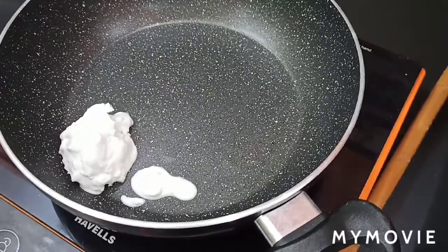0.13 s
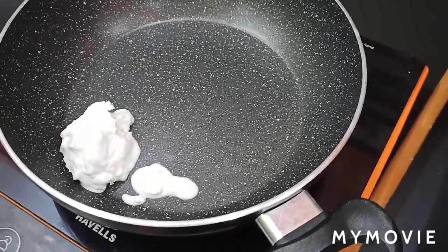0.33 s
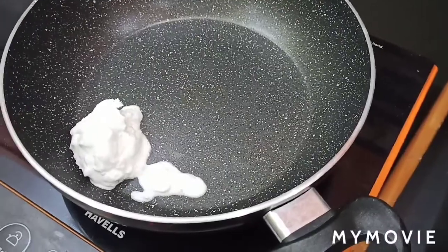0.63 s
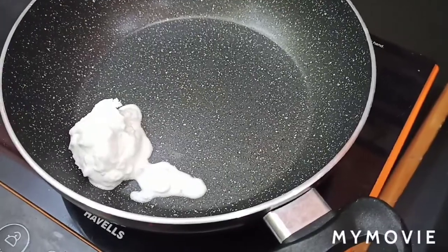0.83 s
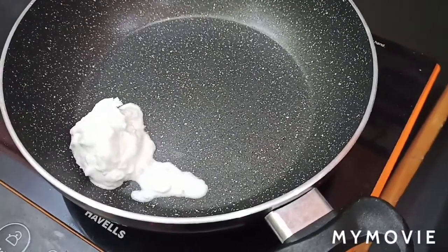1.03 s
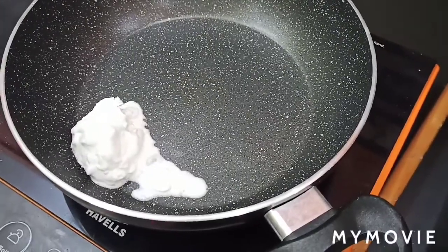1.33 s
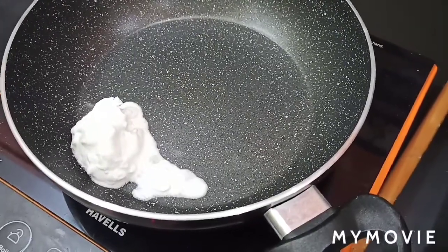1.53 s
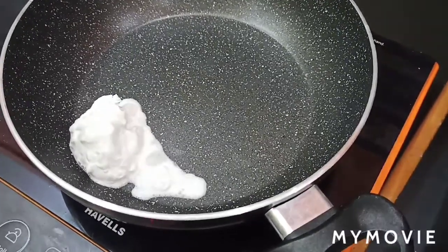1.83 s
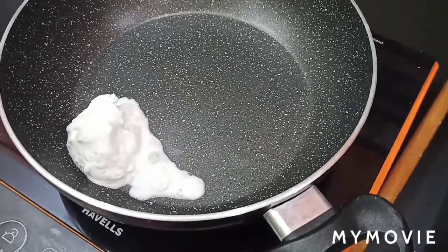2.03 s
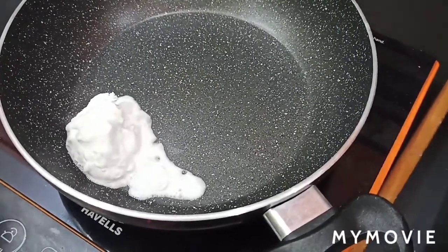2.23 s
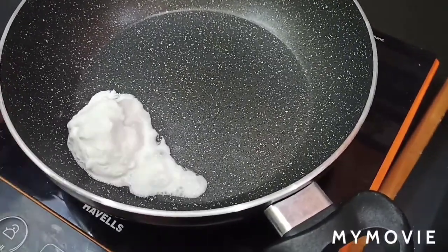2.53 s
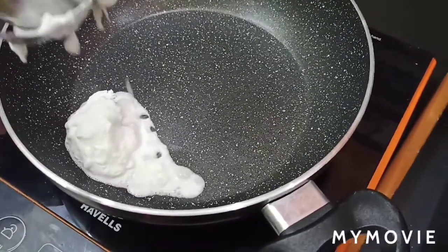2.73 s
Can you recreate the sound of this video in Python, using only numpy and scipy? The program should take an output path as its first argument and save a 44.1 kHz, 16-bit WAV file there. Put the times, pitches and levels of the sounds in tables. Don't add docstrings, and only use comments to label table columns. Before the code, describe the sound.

Butter sizzles in a hot thin pan, close and dry. At first the hiss is duller, soon brighter, with scattered ticks and a thin high pan ringing that fades around 1.4 s. Crackles and fatty spits crowd together from 1.4 to 2 s. One loud, sharp spit cracks at 2.06 s, then sizzling gradually softens with sparser pops. A cooling fan roars steadily below, with faint motor drone and whine.

```python
import sys
import numpy as np
from scipy import signal
from scipy.fft import rfft, irfft, next_fast_len
from scipy.io import wavfile
from scipy.ndimage import uniform_filter1d, map_coordinates

SR = 44100
rng = np.random.default_rng(int(sys.argv[2]) if len(sys.argv) > 2 else 0)


def elevation(decibels):
    levels = np.asarray(decibels, float)
    return 10 ** (levels / 20)


def wav_out(sig):
    wavfile.write(sys.argv[1], SR, np.round(np.clip(np.atleast_2d(sig).T, -1, 1) * 32767).astype(np.int16))


N = 127890

# [f/Hz, level/dB]
AIR_COLOUR = [(25, -31), (45, -25.5), (110, -5), (160, -11.5), (400, -3.5), (540, -8), (900, -9),
              (1250, -14.5), (4500, -25), (6000, -29)]
# [f/Hz, width/Hz, level over the air noise/dB]
HOUSING_RESONANCES = [(292, 4.8, 4.5), (334, 15, 3), (365, 48, 3), (435, 28, 5.5), (453.8, 17, 12.5),
                      (461, 14, 12), (718, 99, 5.5), (820, 26, 7.5), (2940, 540, 6), (107, 16, -1.5)]
MOTOR_HZ = [118, 288, 1142.5, 1306]
# [level/dB, pitch wander/Hz, level wander/dB]
MOTOR_TONES = [(-57, 4, 1.8), (-62, 3, 3), (-53, 2.5, 2), (-66, 5, 1.5)]

# [t/s, sizzle level/dB, treble level/dB]
FRYING = [(0, -34, -11), (.12, -34.5, -4), (.6, -35.5, -1.5), (1.0, -35.5, 0), (1.45, -34, -1),
          (1.7, -35.5, -1.5), (2.0, -36.5, -1.5), (2.15, -36, -5.5), (2.4, -38, -1), (2.6, -37, -2.5),
          (2.8, -39, -1), (2.86, -40, -5), (2.9, -38.5, 2)]
# [f/Hz, level/dB]
SIZZLE_COLOUR = [(2200, -15.5), (3000, -8.5), (3900, -15), (4400, -11), (5000, -4), (7200, 1.5), (9400, -4),
                 (10600, -12), (15400, -6)]
# [delay t/s, level/dB]
ECHOES = [(.0019, -13), (.0031, -12), (.0047, -13), (.0068, -14), (.0095, -15), (.0131, -16)]
PAN_MODE_HZ = [4900, 5530, 6008, 6150, 6387, 6485, 7040, 7502, 8070, 8350, 8900, 9390]
# [width/Hz, level/dB]
PAN_MODES = [(150, -7), (70, -19), (34.7, 12.5), (198, 8), (20, 16), (14, 16), (118.8, -1), (75.6, 8),
             (98, 2.5), (139, -8), (126, -10), (60, -29)]

# [t/s, peak level/dB, f/Hz]
SPRAYS = [(0.4035, -37, 7530), (0.431, -17, 6440), (0.5045, -32, 6550), (0.5644, -28, 6400),
          (0.845, -18.5, 6700), (0.892, -27, 6150), (0.9971, -29, 5990), (1.017, -34, 7480),
          (1.067, -28, 8400), (1.0897, -32, 6450), (1.1194, -19, 7500), (1.324, -17, 6840),
          (1.423, -27, 7470), (1.468, -17, 6900), (1.4715, -17, 7200), (1.5094, -34, 6030),
          (1.528, -17, 7600), (1.5444, -31, 8800), (1.5655, -22, 8160), (1.6584, -17, 7100),
          (1.7454, -19, 7960), (1.785, -20, 7060), (1.817, -20.5, 6300), (1.8672, -27, 8200),
          (1.925, -18.5, 7840), (1.954, -18, 6400), (1.9985, -21, 7300), (2.028, -27, 6420),
          (2.1453, -21, 6170),
    (2.186, -25, 6200),
    (2.248, -39, 7530),
    (2.288, -37, 7260),
    (2.4315, -32, 7460),
    (2.5045, -20, 8000),
    (2.7549, -33, 7000),
    (2.79, -20, 7200),
    (2.8811, -20, 6960),
]
# [t/s, peak level/dB, f/Hz]
BURSTS = [(0.0315, -22.3, 7380), (0.0805, -25.4, 7010), (0.0963, -25.5, 6810), (0.1602, -25.7, 7450),
          (0.4047, -20.6, 6770), (0.4358, -25.4, 6600), (0.5061, -21.6, 7220), (0.6105, -25.4, 6990),
          (0.7846, -23.8, 8070), (0.8443, -24.0, 7840), (0.8944, -22.6, 6910), (0.9969, -26.0, 7000),
          (1.0005, -23.7, 8030), (1.0177, -25.1, 7040), (1.0682, -21.4, 7870), (1.0911, -24.5, 7940),
          (1.1104, -24.9, 7720), (1.1164, -24.5, 7530), (1.1214, -25.6, 7070), (1.1256, -23.7, 7340),
          (1.1569, -24.4, 7760), (1.3928, -25.0, 7620), (1.4, -22.9, 8180), (1.4256, -24.9, 7940),
          (1.4679, -18.9, 7230), (1.4716, -22.3, 7360), (1.4746, -25.2, 7020), (1.4802, -25.5, 7080),
          (1.5457, -22.3, 8190), (1.5644, -25.7, 7840), (1.6605, -22.4, 7160), (1.7472, -26.0, 7360),
          (1.7882, -27.4, 6680), (1.7929, -25.9, 7770), (1.8182, -26.8, 7430), (1.8684, -25.6, 7540),
          (1.9262, -24.5, 7980), (1.9542, -20.6, 6790), (1.9802, -26.5, 6970), (2.0009, -21.8, 7530),
          (2.0278, -23.0, 6590), (2.0339, -24.4, 7040), (2.0391, -23.5, 7850), (2.1017, -25.9, 7160),
          (2.2483, -27.1, 7200), (2.2968, -28.8, 7350), (2.3568, -27.6, 7030), (2.3946, -28.2, 6870),
          (2.4323, -28.3, 6940), (2.5059, -26.2, 7770), (2.6447, -28.9, 7280), (2.7559, -26.7, 6480),
          (2.7632, -27.9, 6920), (2.7847, -29.9, 7010), (2.7897, -26.2, 7000), (2.7926, -30.6, 7330),
          (2.878, -30.1, 6380), (2.8838, -24.9, 7100), (2.8895, -28.2, 6890), (2.8968, -28.6, 6650)]
# [t/s, peak level/dB, f/Hz]
TINY_BURSTS = [(0.0314, -32.6, 11580), (0.1408, -33.2, 13570), (0.1537, -28.6, 13560),
               (0.1926, -33.3, 11400), (0.2034, -31.3, 13150), (0.4565, -31.5, 11310),
               (0.4655, -32.1, 12530), (0.5056, -23.9, 12340), (0.5127, -32.0, 14040),
               (0.5207, -28.6, 14300), (0.6344, -30.8, 12660), (0.8445, -27.5, 11410),
               (1.0005, -25.0, 12300), (1.0034, -31.6, 12390), (1.0681, -26.6, 11800),
               (1.1166, -30.9, 13730), (1.2995, -30.6, 11920), (1.4, -19.6, 11890), (1.4817, -28.6, 12020),
               (1.4971, -29.0, 11300), (1.5306, -30.6, 12580), (1.5346, -29.9, 12720),
               (1.5402, -29.1, 11520), (1.5456, -29.2, 12300), (1.5666, -31.1, 12930),
               (1.5698, -31.1, 12500), (1.6143, -30.7, 13400), (1.7466, -32.7, 12300),
               (1.7928, -29.7, 12010), (1.8721, -33.0, 11310), (1.9625, -29.3, 12380),
               (2.0144, -32.8, 12740), (2.0954, -30.1, 12920), (2.1503, -32.9, 12940),
               (2.2398, -34.1, 12580), (2.2564, -34.5, 11840), (2.2657, -34.8, 12540),
               (2.3136, -30.8, 12270), (2.4135, -33.3, 13790), (2.4559, -34.5, 11580),
               (2.5377, -32.8, 12920), (2.619, -33.5, 11150), (2.6442, -29.2, 12670),
               (2.7154, -30.7, 11810), (2.7298, -35.3, 12060), (2.7644, -31.7, 13170),
               (2.782, -32.4, 12900), (2.7911, -35.8, 12660), (2.8837, -35.3, 12360),
               (2.8901, -36.5, 12920)]
# [t/s, peak level/dB]
BIG_SPIT = [
    (2.0640, -6.5),
]
BIG_MODE_HZ = [3270, 4950, 5600, 6010, 6130, 6476, 7224, 7540, 8050, 9555, 15000]
# [level/dB, time to fall 60 dB t/s]
BIG_MODES = [(-24, .035), (-24, .03), (-22, .03), (-12, .07), (-4, .022), (-22, .09), (-22, .05),
             (-4, .035), (-15, .03), (-24, .04), (-28, .04)]

# [f/Hz, level/dB]
PHONE_LIMIT = [(15480, 0), (15620, -36), (15900, -46), (16700, -70)]


def unit(x):
    return x / np.sqrt(np.mean(x ** 2) + 1e-20)


def along(points, hz):
    f, value = np.transpose(points)
    return np.interp(np.log(hz + 1), np.log(f + 1), value)


def wobble(rate):
    return map_coordinates(rng.standard_normal(1000), [np.arange(N) * rate / SR])


def filtered(x, response):
    size = next_fast_len(N + SR // 2)
    hz = np.fft.rfftfreq(size, 1 / SR)
    return irfft(rfft(x, size) * response(hz), size)[..., :N]


def patchy(depth_db):
    noise = signal.stft(rng.standard_normal(N + 512), nperseg=256)[2]
    patches = uniform_filter1d(rng.standard_normal(noise.shape), size=10, axis=0)
    patches = uniform_filter1d(patches, size=4, axis=1)
    return unit(signal.istft(noise * elevation(depth_db * unit(patches)), nperseg=256)[1][:N])


def fan_air():
    def housing(f):
        lift = sum((elevation(2 * db) - 1) / (1 + (2 * (f - centre) / width) ** 2)
                   for centre, width, db in HOUSING_RESONANCES)
        return elevation(along(AIR_COLOUR, f)) * np.sqrt(1 + lift)

    level_db = -39 + 0.051 * wobble(6.2)
    return elevation(level_db) * unit(filtered(patchy(depth_db=-0.5), housing))


def fan_motor():
    tones = np.zeros(N)
    for hz, (db, wander_hz, wander_db) in zip(MOTOR_HZ, MOTOR_TONES):
        level = elevation(db + wander_db * wobble(11.87)) * np.sqrt(2)
        phase = 2 * np.pi * np.cumsum(hz + wander_hz * wobble(8)) / SR
        tones += level * np.sin(phase)
    return tones


def bubbles():
    per_s, pitch_hz, pitch_spread, cycles, size_db = 2400, 8530, 0.31, 5.8, -0.5
    u = rng.random((12000, 4))[:int(per_s * N / SR)]
    t = np.arange(96) / SR
    bell = np.sqrt(-2 * np.log(u[:, 1] + 1e-9)) * np.cos(2 * np.pi * u[:, 3])
    hz = np.clip(pitch_hz * np.exp(pitch_spread * bell), 1500, 18000)[:, None]
    size = elevation(-size_db * np.log(u[:, 2] + 0.05))[:, None]
    bursts = size * np.sin(2 * np.pi * hz * t) * np.exp(-t * hz * np.e / cycles)
    at = (u[:, :1] * N).astype(int) + np.arange(len(t))
    pops = np.bincount(at.ravel(), bursts.ravel())[:N]
    colour = uniform_filter1d(np.abs(rfft(pops)) ** 2, size=3000) ** .5
    return unit(irfft(rfft(pops) / (colour + 1e-3 * colour.max()), N))


def pan_ring(steady):
    ring_db, sing_db, sing_hz = -7, -7, 6485
    ring_ends_s, ring_fade_s, ring_drop_db, sing_starts_s = 1.38, .1, 13, .2
    t = np.arange(N) / SR

    def modes(f):
        total = 0
        for k, (centre, (width, db)) in enumerate(zip(PAN_MODE_HZ, PAN_MODES)):
            damping = 1j * f * width
            total = total + (-1) ** k * elevation(db) * damping / (centre * centre - f * f + damping)
        return total

    damped_db = ring_drop_db / (1 + np.exp((ring_ends_s - t) / ring_fade_s))
    ring = unit(filtered(steady, modes)) * elevation(ring_db - damped_db)
    quiet_start_db = 8.4 * np.exp(-(t / sing_starts_s) ** 4)
    sing_level = elevation(sing_db + 2 * wobble(15.2) - damped_db - quiet_start_db)
    sing_phase = 2 * np.pi * np.cumsum(sing_hz + 5 * wobble(18)) / SR
    return ring + sing_level * np.sin(sing_phase)


def sizzle():
    steam_db, clump_db, bright_hz = 2.5, 2.62, 10000
    t = np.arange(N) / SR
    at_s, *columns = np.transpose(FRYING)
    level_db, bright_db = [np.interp(t, at_s, column) for column in columns]
    pops = bubbles()
    clumps = 0.3 * wobble(30.17) + 0.7 * wobble(80)
    clumps = clumps - uniform_filter1d(clumps, size=SR // 6)
    clump_share = np.interp(t, [1, 1.38], [.5, 1])
    steady = pops + elevation(steam_db) * patchy(depth_db=1.8)
    clumped = steady * elevation(clump_db * clumps * clump_share)

    def colour(f):
        echoes = 1 + sum(elevation(db) * np.exp(-2j * np.pi * f * s) for s, db in ECHOES)
        return elevation(along(SIZZLE_COLOUR, f)) * (f > 1500) * echoes

    body = unit(filtered(clumped, colour))
    treble = filtered(body, lambda f: 1 / (1 + (bright_hz / (f + 1)) ** 8))
    return elevation(level_db) * (body + (elevation(bright_db) - 1) * treble + pan_ring(steady))


def band(lo_hz, hi_hz, t):
    sos = signal.butter(3, [lo_hz, hi_hz], "band", fs=SR, output="sos")
    return unit(signal.sosfilt(sos, rng.standard_normal(len(t))))


def dying(t, t60):
    return elevation(-60 * t / t60)


def spray(t, hz):
    return elevation(-14) * band(.9 * hz, 1.25 * hz, t) * np.exp(-(t / .008) ** 3)


def tick(t, hz, peak_s):
    half_width_s, echo_db, echo_t60 = .00013, -11, .035
    u = t - peak_s
    snap = np.cos(2 * np.pi * hz * u) * np.exp(-.5 * (u / half_width_s) ** 2)
    echo = elevation(echo_db) * band(.8 * hz, 1.15 * hz, t) * dying(t, echo_t60) * (u > 0)
    return snap + echo


def big_spit(t):
    swell_s = .0006
    ring = sum(elevation(db) * np.sin(2 * np.pi * hz * t) * dying(t, t60)
               for hz, (db, t60) in zip(BIG_MODE_HZ, BIG_MODES))
    crack = elevation(-16) * band(4040, 9200, t) * dying(t, .016)
    drops = elevation(-23) * band(5600, 9500, t) * dying(t, .13)
    return ring * (1 - np.exp(-t / swell_s)) + crack + drops


def spits():
    spray_lag_s, spray_db, tick_peak_s, tick_db = .0008, -3, .0004, -.8
    out = np.zeros(N + SR)
    t = np.arange(SR // 5) / SR

    def place(sound, start_s, db):
        out[round(start_s * SR):][:len(t)] += elevation(db) * sound

    for s, db, hz in SPRAYS:
        place(spray(t, hz), s + spray_lag_s, db + spray_db)
    for s, db, hz in BURSTS + TINY_BURSTS:
        place(tick(t, hz, tick_peak_s), s - tick_peak_s, db + tick_db)
    for s, db in BIG_SPIT:
        place(big_spit(t), s, db)
    return out[:N]


def scene():
    frying = sizzle() + spits()
    fan = fan_air() + fan_motor()
    return (frying + fan)[None]


def band_limit(x):
    return signal.sosfilt(signal.butter(12, 16800, fs=SR, output="sos"), x)


def record(dry):
    mix = filtered(dry, lambda f: elevation(along(PHONE_LIMIT, f)))
    return band_limit(mix)


dry = scene()
out = record(dry)
wav_out(out)
```